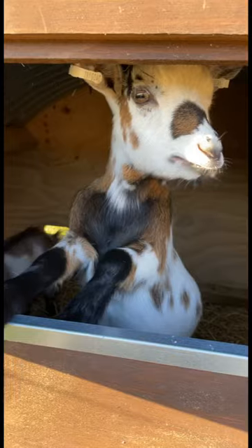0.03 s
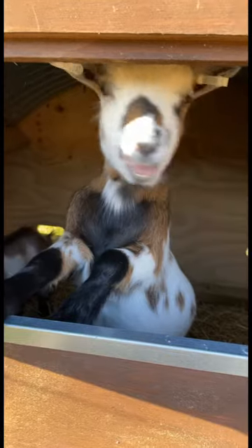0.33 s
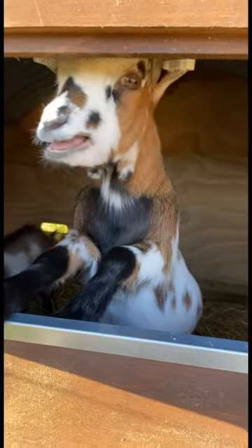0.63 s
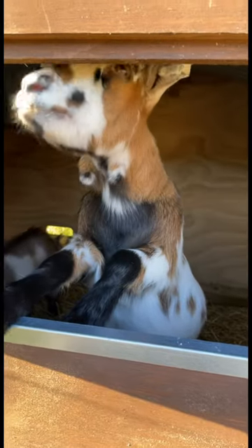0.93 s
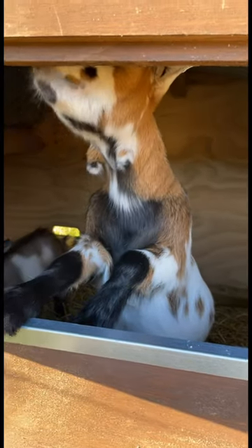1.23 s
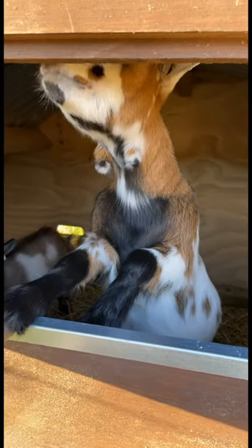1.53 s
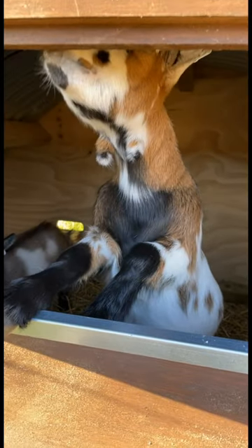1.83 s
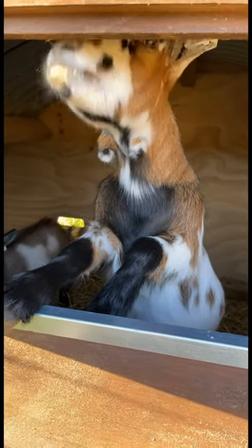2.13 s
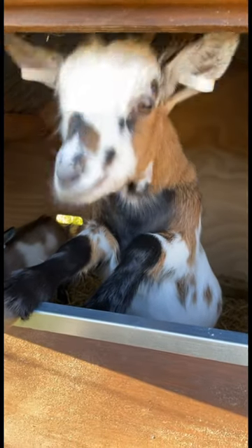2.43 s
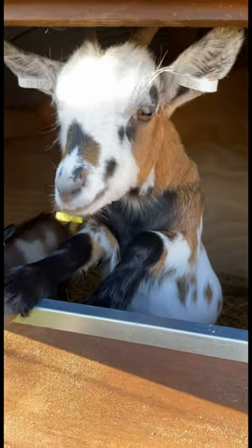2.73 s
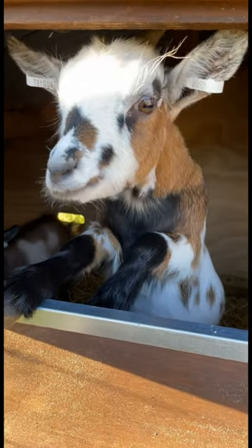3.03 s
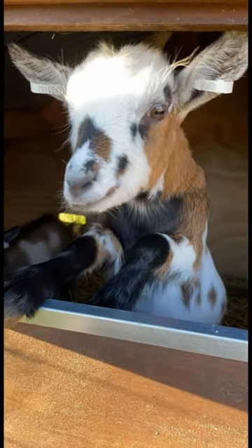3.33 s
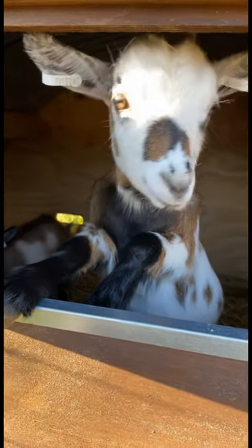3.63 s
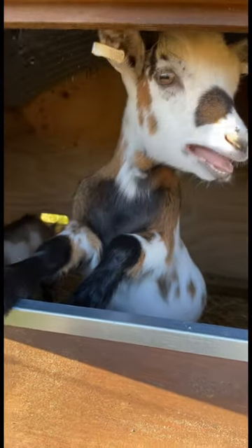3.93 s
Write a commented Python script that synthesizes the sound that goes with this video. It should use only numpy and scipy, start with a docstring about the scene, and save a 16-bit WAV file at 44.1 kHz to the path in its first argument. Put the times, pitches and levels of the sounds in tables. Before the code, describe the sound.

A young goat bleats close by in a wooden stall from about 0.3 to 0.8 seconds, a soft, throbbing call that ends in creaks. A faint outdoor rumble and hum fade in and stay. Light ticks come at about 1.2 and 2.8 seconds, and a few birds chirp far off. At 3.7 seconds the goat bleats again, much louder, still calling at the end at 4 seconds.

```python
"""One microphone near a young goat in a wooden stall, the yard behind it.
At 0.3 s the goat bleats, throbbing about eleven times a second: pitch and effort swell together,
and the vocal folds creak in the dips. A low outdoor rumble and a faint hum fade in as the bleat
ends in three single creaks. Two light ticks sound in the stall and a few birds chirp far off.
At 3.7 s the goat bleats again, much louder, and is still calling at the end."""
import sys
import numpy as np
from scipy import signal
from scipy.fft import rfft, irfft
from scipy.io import wavfile
from scipy.ndimage import uniform_filter1d, minimum_filter1d

SR = 44100
rng = np.random.default_rng(int(sys.argv[2]) if len(sys.argv) > 2 else 0)


def transcribe(signal):
    """Save signal, clipped to [-1, 1], as a 16-bit WAV file at the path in sys.argv[1]."""
    frames = np.atleast_2d(signal).T
    limited = np.clip(frames, -1, 1)
    pcm = np.round(limited * 32767).astype(np.int16)
    wavfile.write(sys.argv[1], SR, pcm)


N = 176400
TIME = np.arange(N) / SR

# vocal folds in the soft bleat and the loud one: time_s, pitch_hz, roughness (0-1)
SOFT_FOLDS = [(.294,580,.05),(.308,570,.1),(.318,400,.8),(.337,265,.5),(.361,505,.08),(.376,520,.05),(.381,565,.05),(.394,588,.03),(.407,555,.1),(.424,395,.3),(.436,395,.2),(.452,505,.1),(.469,575,.03),(.482,594,.03),(.494,555,.15),(.51,385,.4),(.537,360,.2),(.551,475,.1),(.568,505,.1),(.577,545,.15),(.595,420,.35),(.607,320,.3),(.628,270,.3),(.655,460,.08),(.677,447,.05),(.687,405,.25),(.698,275,.4),(.717,190,.5),(.737,335,.4),(.762,280,.15),(.79,235,.4),(.81,170,.5)]
LOUD_FOLDS = [(3.664,480,.4),(3.678,510,.25),(3.692,340,.4),(3.706,150,.4),(3.716,65,.3),(3.73,220,.6),(3.746,520,.2),(3.757,540,.03),(3.774,518,.1),(3.781,270,.45),(3.80,320,.6),(3.815,400,.6),(3.825,510,.2),(3.837,541,.1),(3.848,546,.12),(3.856,552,.1),(3.863,510,.6),(3.872,370,.8),(3.89,390,.6),(3.903,475,.3),(3.914,538,.03),(3.929,547,.02),(3.938,573,.03),(3.947,550,.1),(3.956,380,.8),(3.975,350,.6),(3.988,455,.15),(4.0,520,.1)]
# effort in the throat's three registers, before the trims: time_s, bright_db, middle_db, low_db
SOFT_EFFORT = [(0.29, -48, -52, -68), (0.296, -37.5, -43, -46.5), (0.304, -32, -32.5, -48),
               (0.328, -60, -73, -67), (0.35, -55, -71, -67), (0.364, -42, -44, -59.5),
               (0.398, -32.5, -40.5, -39), (0.414, -44.5, -54, -59), (0.438, -54, -76, -55),
               (0.458, -39, -37, -56), (0.47, -29, -61, -40.5), (0.482, -30, -49, -32.5),
               (0.492, -25.5, -36, -37.5), (0.504, -51, -56, -52.5), (0.532, -49.5, -56, -58.5),
               (0.55, -37, -69, -49.5), (0.58, -28.5, -43, -37.5), (0.61, -46, -56, -54.5),
               (0.63, -44.5, -67, -53), (0.656, -33.5, -55, -41), (0.672, -32.5, -60, -42.5),
               (0.682, -31, -56, -39), (0.694, -42, -69, -49), (0.716, -44.5, -65, -50),
               (0.764, -42.5, -74, -48.5), (0.81, -62, -83, -56.5)]
LOUD_EFFORT = [(3.66, -65, -73, -33), (3.67, -38.5, -54, -50.5), (3.686, -37.5, -45, -49.5),
               (3.726, -61, -72, -60), (3.756, -29.5, -32.5, -51), (3.784, -23, -30.5, -36.5),
               (3.804, -39.5, -50, -54), (3.818, -34, -45, -44.5), (3.828, -18.5, -51, -29),
               (3.848, -12.5, -32.5, -17), (3.86, -12, -28, -20.5), (3.874, -33, -31, -53),
               (3.89, -43, -44, -39), (3.9, -32, -53, -45.5), (3.924, -7.5, -23, -22),
               (3.944, -14.5, -14, -28), (3.958, -68, -63, -55), (3.976, -49, -68, -71),
               (4.0, -26.5, -45.5, -39)]
# the mouth's piercing resonance, moving as the jaw opens and closes: time_s, centre_hz, boost_db
SOFT_MOUTH = [(.3,4640,10.5),(.40,4650,3),(.48,4570,8.5),(.497,5200,7.5),(.52,4600,-10),(.555,4240,8),(.58,4300,2.5),(.6,4570,-10),(.665,3880,11),(.76,3820,10.5),(.84,3700,16)]
LOUD_MOUTH = [(3.68,4100,14),(3.73,4500,4.4),(3.75,4400,18),(3.77,4250,13),(3.775,5150,19),(3.80,4650,4),(3.835,4800,2),(3.85,5500,2.2),(3.863,4550,7.3),(3.899,4700,1.8),(3.923,4900,5),(3.94,4540,9.9),(3.96,4600,2.1),(4.0,5000,2)]
# the lowest resonance, following the jaw: time_s, centre_hz, width_hz
SOFT_JAW = [(.3,1250,162),(.49,1180,160),(.56,1340,370),(.6,1220,335),(.665,1140,430),(.8,1070,450)]
LOUD_JAW = [(3.68,850,700),(3.76,750,500),(3.785,820,130),(3.84,1080,120),(3.93,1188,150),(4.0,1190,200)]
# throat resonances: centre_hz, width_hz, gain_db
SOFT_THROAT = [(2190,136,-12),(2940,400,-7),(3536,297,1.5),(4030,304,0.5),(4710,330,0.5),(5295,150,2.5),(6440,680,-12),(7800,660,-35)]
LOUD_THROAT = [(2080,180,-11.5),(2770,140,4.5),(3996,160,-2),(4380,185,2),(4920,227,1.5),(5370,170,-7.5),(6105,260,-8),(6670,120,-14),(6900,200,-18.5),(7740,940,-25)]
# balance of the voice: bright_trim_db, middle_trim_db, low_trim_db, air_db, fundamental_db, jaw_db
SOFT_VOICE = (0.5, -3.5, 0.5, -19.5, -48, -8)
LOUD_VOICE = (1.5, -6.5, 0, -27, -34.5, 4.5)
# thin rasp above the voice: time_s, level_db
SOFT_RASP = [(0.29, -87), (0.304, -64.5), (0.328, -87), (0.4, -71), (0.438, -85), (0.49, -71), (0.514, -81),
             (0.592, -70), (0.604, -79), (0.65, -70), (0.668, -77), (0.68, -70), (0.77, -83), (0.81, -91)]
LOUD_RASP = [(3.66, -87), (3.674, -73), (3.73, -83), (3.78, -56), (3.79, -66), (3.82, -62), (3.836, -45.5),
             (3.858, -49), (3.89, -70.5), (3.924, -44.5), (3.944, -52), (3.962, -72), (3.982, -72),
             (4.0, -56)]
# colour of the rasp: centre_hz, width_hz, relative_db
SOFT_RASP_BANDS = [(9400,1200,0),(11400,1800,-8),(14500,2500,2)]
LOUD_RASP_BANDS = [(8900,1500,1),(11000,2800,-13),(14800,2600,-11)]
# spectrum of the yard's rumble: frequency_hz, relative_db
YARD_SPECTRUM = [(15, -25), (25, -5.5), (64, 3), (129, 1.5), (173, -6), (267, -1), (445, -24), (495, -20.5),
                 (631, -11.5), (782, -9), (919, -15.5), (1300, -18.5), (1620, -27), (2300, -34.5),
                 (3000, -39), (4500, -31.5), (5280, -38), (6050, -47), (7700, -49.5), (9050, -59),
                 (15500, -53)]
# swell of that rumble: time_s, level_db
YARD_LEVEL = [(0,-130),(.285,-125),(.3,-67.5),(.5,-68.5),(.7,-54),(.9,-50),(1.6,-49.5),(2.5,-48),(3.5,-46),(4,-50.5)]
# the folds' last single closures after the soft bleat: start_s, strength_db
LAST_CLOSURES = [(.814,-15),(.8245,-15),(.836,-7)]
# ticks close by in the stall: start_s, strength_db
STALL_TICKS = [(1.181,-47),(2.768,-40)]
# far birds: start_s, length_s, start_hz, end_hz, level_db, settling (1 = straight, more = glide and hold)
FAR_CHIRPS = [(1.356,0.13,4610,4370,-74.5,1),(2.29,0.14,5820,5095,-68,4.7),(2.82,.12,6640,6780,-87,3),(3.06,.05,7900,7300,-83,1),(3.14,0.037,4200,4430,-69,0.89),(3.192,0.086,5730,5400,-76,2),(3.432,0.045,3370,3990,-71,1),(3.465,.03,7250,7900,-77,2)]


def from_db(db):
    """Decibels to gain."""
    return 10 ** (np.asarray(db) / 20)


def in_time(rows):
    """Each column of a curve, joined by straight lines."""
    times, *columns = np.transpose(rows)
    return [np.interp(TIME, times, column) for column in columns]


def butter(x, hz, kind, order=2):
    """Causal Butterworth filter."""
    return signal.sosfilt(signal.butter(order, hz, kind, fs=SR, output="sos"), x + 1e-18)


def resonate(x, hz, width_hz):
    """One resonance, gain 1 at its peak."""
    radius = np.exp(-np.pi * width_hz / SR)
    gain = (1 - radius ** 2) / 2
    feedback = [1, -2 * radius * np.cos(2 * np.pi * hz / SR), radius ** 2]
    return signal.lfilter([gain, 0, -gain], feedback, x + 1e-18)


def ring(x, hz, width_hz):
    """Two resonances in series, for steeper skirts."""
    return resonate(resonate(x, hz, width_hz), hz, 2 * width_hz)


def glide(x, hz, width_hz, block=128):
    """A resonance whose centre and width move, gain 1 at its peak."""
    out, state = np.zeros(N), np.zeros(2)
    for i in range(0, N, block):
        radius = np.exp(-np.pi * width_hz[i] / SR)
        gain = (1 - radius ** 2) / 2
        feedback = [1, -2 * radius * np.cos(2 * np.pi * hz[i] / SR), radius ** 2]
        out[i:i + block], state = signal.lfilter([gain, 0, -gain], feedback, x[i:i + block], zi=state)
    return out


def even(x):
    """Hold the level near rms 1 over a few cycles."""
    power = uniform_filter1d(uniform_filter1d(x * x, size=260), size=200)
    return x / np.sqrt(np.abs(power) + np.mean(x * x) / 20)


def vocal_folds(pitch_hz, rough, air_db, jitter=0.072, shimmer_db=5.5, rough_air_db=24):
    """A pulse and a puff of air per closure, uneven and breathier when rough; also the phase in cycles."""
    cycles = np.cumsum(pitch_hz) / SR
    at = np.interp(np.arange(1, int(cycles[-1])), cycles, np.arange(N))
    timing_draw, strength_draw = rng.standard_normal((len(at), 2)).T
    roughness, period = rough[at.astype(int)], SR / pitch_hz[at.astype(int)]
    at = np.clip(at + jitter * roughness * period * timing_draw, 10, N - 20)
    strength = np.sqrt(period) * from_db(shimmer_db * roughness * strength_draw)
    # windowed sincs let the closures fall between samples
    taps = at.astype(int)[:, None] + np.arange(-10, 10)
    offset = taps - at[:, None]
    pulses = np.zeros(N)
    np.add.at(pulses, taps, strength[:, None] * np.sinc(offset) * np.sinc(offset / 10))
    puffs = 2 * np.exp(-3 * (cycles % 1)) * rng.standard_normal(N)
    return pulses + from_db(air_db + rough_air_db * rough) * puffs, cycles


def vocal_tract(source, throat, jaw, jaw_db, mouth):
    """The pulses ring the throat, jaw and mouth; the nose swallows one band."""
    jaw_hz, jaw_width_hz = in_time(jaw)
    mouth_hz, boost_db = in_time(mouth)
    sound = sum((-1) ** k * from_db(db) * resonate(source, hz, width_hz)
                for k, (hz, width_hz, db) in enumerate(throat))
    sound -= from_db(jaw_db) * glide(source, jaw_hz, jaw_width_hz)
    sound += (from_db(boost_db) - 1) * glide(sound, mouth_hz, width_hz=np.full(N, 190))
    sound -= resonate(sound, hz=1667, width_hz=120)  # the nose
    return butter(sound, 7570, "low", order=8)


def rasp(source, level, bands):
    """The top of the pulses, mixed with air, rides thinly above the voice."""
    airy = butter(source + 0.95 * rng.standard_normal(N), 7600, "high", order=6)
    coloured = sum(from_db(db) * resonate(airy, hz, width_hz) for hz, width_hz, db in bands)
    return even(coloured) * from_db(in_time(level)[0])


def bleat(folds, effort, mouth, jaw, throat, voice, rasp_level, rasp_bands, middle_hz=(2450, 3300)):
    """The goat near the microphone: folds drive the tract, and each register swells with the effort."""
    bright_trim_db, middle_trim_db, low_trim_db, air_db, fundamental_db, jaw_db = voice
    pitch_hz, rough = in_time(folds)
    bright_db, middle_db, low_db = in_time(effort)
    source, cycles = vocal_folds(pitch_hz, rough, air_db)
    sound = vocal_tract(source, throat, jaw, jaw_db, mouth)
    low_band = butter(butter(sound, middle_hz[0], "low", order=8), 603, "high", order=4)
    low = even(low_band) * from_db(low_db + low_trim_db)
    middle = even(butter(sound, middle_hz, "band", order=4)) * from_db(middle_db + middle_trim_db)
    bright = even(butter(sound, middle_hz[1], "high", order=8)) * from_db(bright_db + bright_trim_db)
    # the fundamental follows a share of the bright register's swing
    fundamental = from_db(fundamental_db + 0.56 * bright_db) * np.sin(2 * np.pi * cycles)
    sounding = (TIME >= folds[0][0]) & (TIME <= effort[-1][0])
    gate = uniform_filter1d(1.0 * sounding, size=60)
    return gate * (bright + middle + low + fundamental + rasp(source, rasp_level, rasp_bands))


def stall(x, t60_s=0.067, level_db=-13):
    """Dense, quickly dying reflections from the planks."""
    t = TIME[:SR // 2]
    tail = butter(rng.standard_normal(len(t)), 6840, "low") * from_db(-60 * t / t60_s) * (t > .003)
    return from_db(level_db) * signal.fftconvolve(x, tail / np.sqrt(np.sum(tail ** 2)))[:N]


def yard_rumble():
    """A low outdoor rumble with a thin hiss, fading in behind the goat."""
    hz, db = np.transpose(YARD_SPECTRUM)
    bins_hz = np.maximum(np.arange(N // 2 + 1) * SR / N, 1)
    colour = from_db(np.interp(np.log(bins_hz), np.log(hz), db))
    noise = irfft(rfft(rng.standard_normal(N)) * colour, N)
    noise = butter(noise, 33, "high", order=3)
    return noise / noise.std() * from_db(in_time(YARD_LEVEL)[0])


def yard_hum(loudest_db=-64.5):
    """A faint wavering hum outdoors: a narrow band of noise that swells with the rumble."""
    swell_db = in_time(YARD_LEVEL)[0]
    tone = ring(rng.standard_normal(N), hz=265.4, width_hz=14)
    return tone / tone.std() * from_db(loudest_db + swell_db - swell_db.max())


def creaks():
    """Single closures of the folds ring the nearly closed mouth."""
    clicks = np.zeros(N)
    for start_s, strength_db in LAST_CLOSURES:
        clicks[int(start_s * SR)] += from_db(strength_db)
    return butter(ring(clicks, hz=3670, width_hz=530), 7570, "low", order=6)


def ticks(decay_s=0.0064):
    """Small dry ticks close by, each a burst of ringing noise."""
    bursts = np.zeros(N)
    for start_s, strength_db in STALL_TICKS:
        decay = np.exp(-np.minimum(np.abs(TIME - start_s) / decay_s, 20))
        bursts += from_db(strength_db) * (TIME > start_s) * decay
    return ring(bursts * rng.standard_normal(N), hz=4400, width_hz=680)


def far_birds(echo_boost_db=8):
    """Thin, distant whistles that glide and settle, blurred by reflections."""
    whistles = np.zeros(N)
    for start_s, length_s, start_hz, end_hz, level_db, settling in FAR_CHIRPS:
        progress = np.clip((TIME - start_s) / length_s, 0, 1)
        pitch_hz = end_hz + (start_hz - end_hz) * (1 - progress) ** settling
        envelope = from_db(level_db) * np.abs(np.sin(np.pi * progress)) ** 0.43
        whistles += envelope * np.sin(2 * np.pi * np.cumsum(pitch_hz) / SR)
    return whistles + from_db(echo_boost_db) * stall(whistles)


def scene():
    """The goat close by in its stall and the yard behind, in mono."""
    soft = bleat(SOFT_FOLDS, SOFT_EFFORT, SOFT_MOUTH, SOFT_JAW, SOFT_THROAT, SOFT_VOICE,
                 SOFT_RASP, SOFT_RASP_BANDS)
    loud = bleat(LOUD_FOLDS, LOUD_EFFORT, LOUD_MOUTH, LOUD_JAW, LOUD_THROAT, LOUD_VOICE,
                 LOUD_RASP, LOUD_RASP_BANDS)
    near = soft + creaks() + ticks() + loud
    return (near + stall(near) + yard_rumble() + yard_hum() + far_birds())[None]


def record(dry, limit_db=-2.5, window_s=0.001, cutoff_hz=15600):
    """After the microphone, a fast limiter holds the loudest throbs and the top is cut steeply."""
    window = int(window_s * SR)
    gain = np.minimum(1, from_db(limit_db) / (np.abs(dry) + 1e-9))
    limited = dry * uniform_filter1d(minimum_filter1d(gain, window), window)
    return signal.sosfilt(signal.ellip(10, .1, 80, cutoff_hz, fs=SR, output="sos"), limited)


dry = scene()
out = record(dry)
transcribe(out)
```